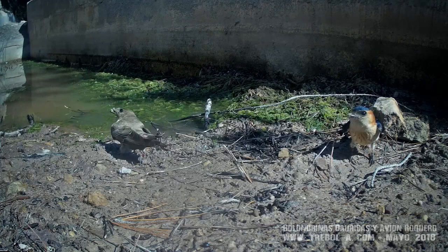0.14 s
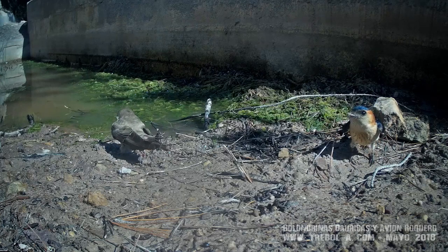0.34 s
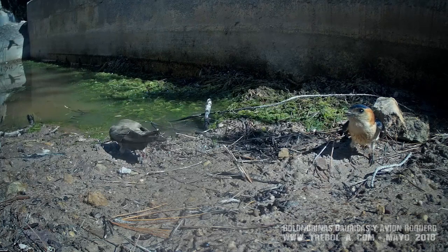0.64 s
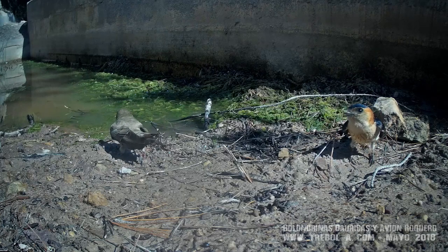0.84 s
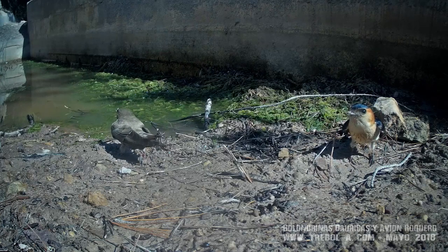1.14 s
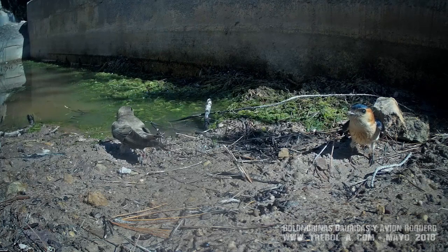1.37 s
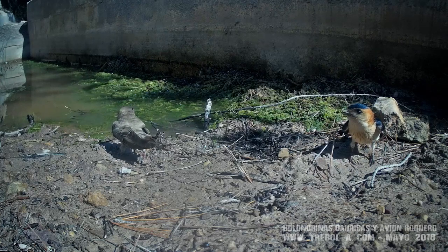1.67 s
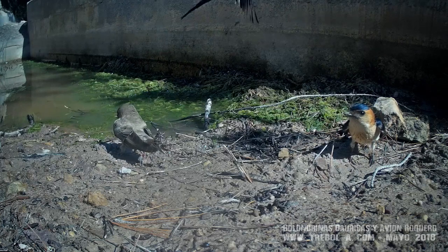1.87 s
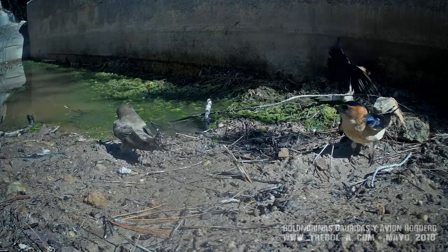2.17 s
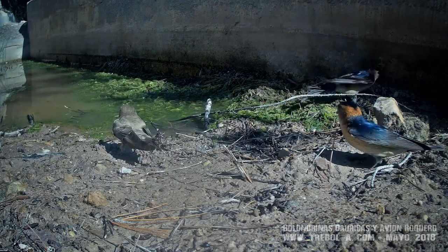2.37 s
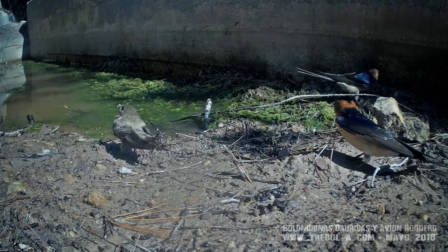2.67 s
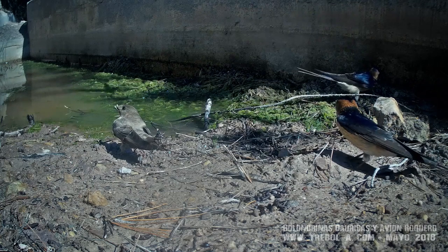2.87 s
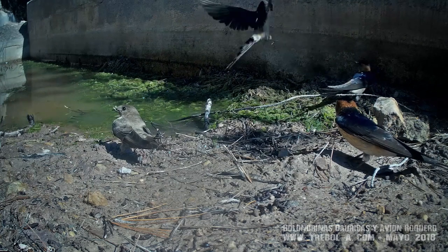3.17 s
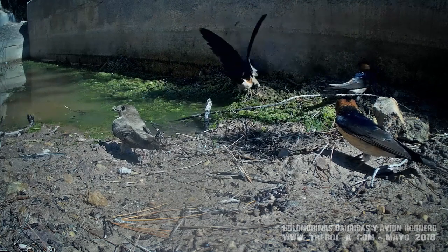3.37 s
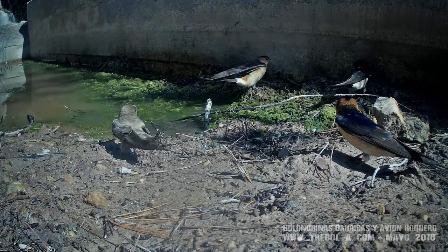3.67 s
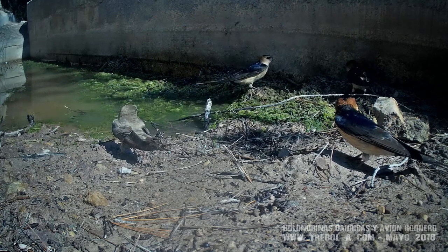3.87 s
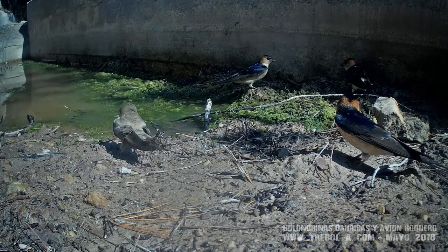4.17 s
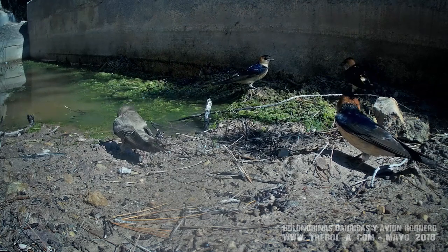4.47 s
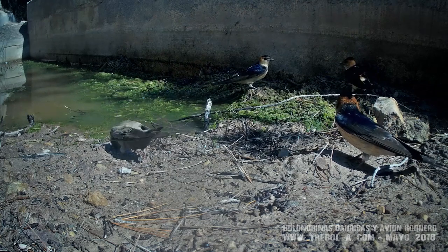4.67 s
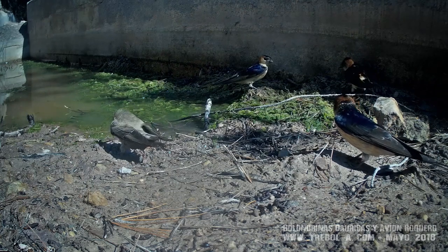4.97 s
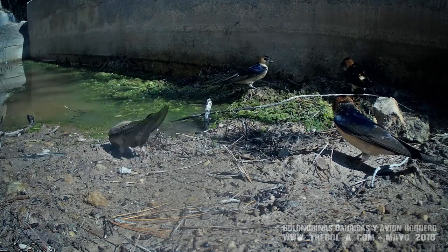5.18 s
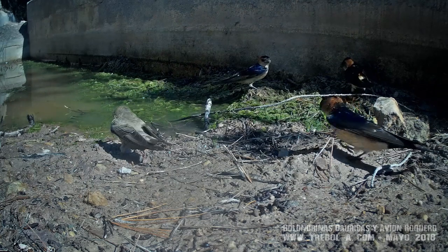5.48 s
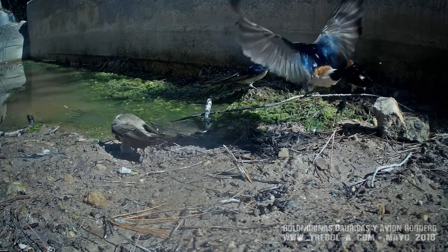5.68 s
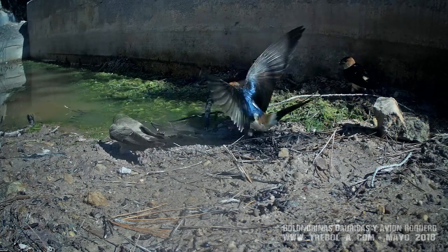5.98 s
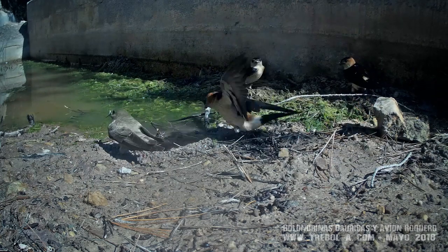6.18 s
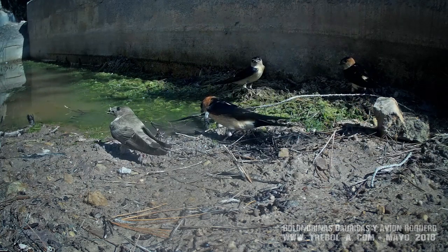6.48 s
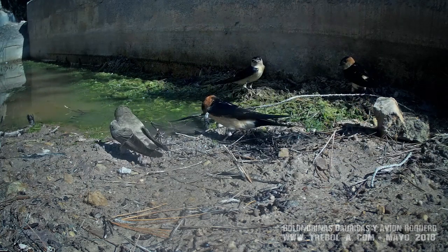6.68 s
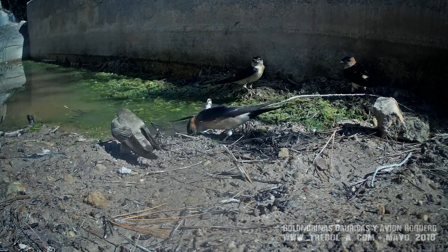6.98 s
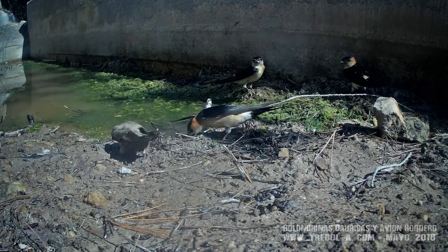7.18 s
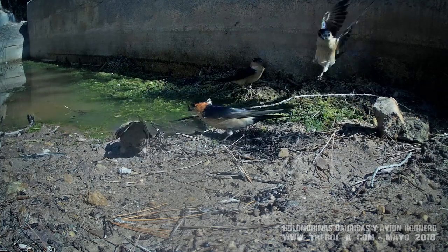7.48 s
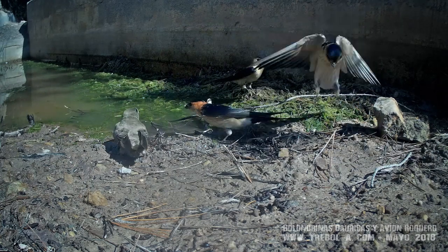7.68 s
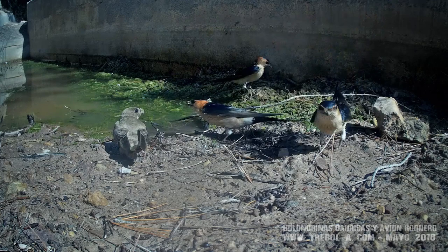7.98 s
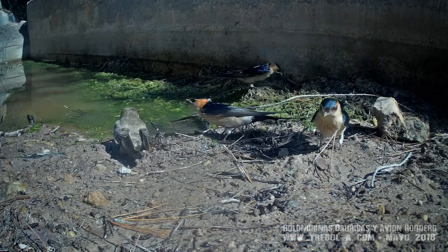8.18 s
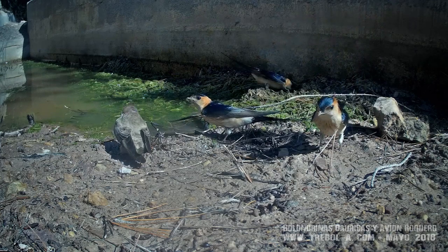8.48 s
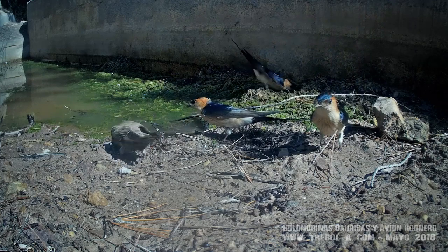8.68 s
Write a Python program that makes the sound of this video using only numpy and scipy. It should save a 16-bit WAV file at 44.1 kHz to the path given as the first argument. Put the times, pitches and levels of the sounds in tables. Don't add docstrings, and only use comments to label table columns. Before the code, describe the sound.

A near small bird repeats quick, buzzy double chirps while a softer mate answers; wings flutter briefly over faint traffic hum, wind and hiss.

```python
import sys
import numpy as np
from scipy import signal
from scipy.fft import rfft, irfft, next_fast_len
from scipy.io import wavfile
from scipy.ndimage import uniform_filter1d, map_coordinates

SR = 44100
rng = np.random.default_rng(int(sys.argv[2]) if len(sys.argv) > 2 else 0)


def amplitude_ratio(level_db):
    exponent = np.asarray(level_db, float) / 20
    return 10 ** exponent


def persist_wave(psi):
    counts = np.round(np.clip(psi, -1, 1) * 32767).astype(np.int16)
    wavfile.write(sys.argv[1], SR, np.atleast_2d(counts).T)


N = 389403

# [t/s, level/dB]
GUSTS = [(0.0, -68), (2.11, -63.5), (2.88, -67), (2.95, -54), (3.81, -70.5), (3.96, -50), (4.01, -69),
         (5.61, -68.5), (5.63, -60), (6.69, -69), (7.84, -59.5), (7.92, -69), (8.73, -67.5), (8.83, -60.5)]
# [f/Hz, level/dB]
WIND_COLOUR = [(11, -33), (18, 11.5), (59, 8), (97, 4.5), (167, 0), (200, -3.5), (260, -62), (440, -120)]
HUM_COLOUR = [(35, -40), (60, -0.5), (241, -3.5), (428, -7), (504, -8.5), (574, -10), (644, -10.5),
              (1180, -16), (3000, -28.5), (3900, -69.5), (6600, -120)]
HISS_COLOUR = [(880, 1.5), (1500, -18), (1880, -0.5), (2080, -10.5), (3030, -4), (4420, -3.5), (4690, -5.5),
               (14200, -7.5), (16000, -11)]
# [t/s, peak level/dB, feather hiss level/dB]
FLAPS = [(2.082, -36.5, -33.5), (2.129, -53, -4), (3.299, -52, 14), (3.449, -52, -10), (5.718, -55, -12),
         (5.839, -38.5, -22), (5.919, -40.5, -9), (7.449, -43, -22), (7.469, -40, -17.5),
         (7.609, -42.5, -16), (7.699, -54.5, -17.5), (7.779, -62, -11.5)]
# [delay t/s, level/dB]
ECHOES = [(.0058, -17), (.0068, -18), (.0127, -17), (.0163, -15), (.0189, -14), (.02, -16), (.0207, -13),
          (.04, -27)]
# [f/Hz, time to fall 60 dB t/s]
YARD_RING = [(500, .1), (2000, .1), (3500, .1), (7000, .085), (14000, .055)]
# [f/Hz, level/dB]
SIDEWAYS = [(600, -8), (1400, 2), (2200, -2), (3000, 3), (3600, -8), (3850, -5), (4300, 0), (4800, -7),
            (5600, -4), (12000, -5)]
# [f/Hz, level/dB]
HOUSING = [(3150, 1), (3380, 8), (3600, 11), (3800, 1), (4150, -10), (4600, 0), (6600, -1), (7400, -19),
           (9500, -5), (11300, 5), (12500, 2), (13400, -11), (14700, 2), (16000, 1)]
HOUSING_ASIDE = [(3100, 0.15), (3550, 5), (4050, -7), (5000, 0), (6200, -4), (7800, -4), (11000, 3),
                 (15000, -10)]
# [t/s, share 0-1]
ASIDE = [
    (2, 0.01),
    (2.3, 0.13),
    (3.4, 0.043),
    (3.9, 1),
]

# [start t/s, top t/s, start f/Hz, top f/Hz, effort level/dB]
GROUND_BIRD = [
    (5.988, 6.033, 756, 845, -46),
    (6.026, 6.042, 816, 837, -51),
    (6.068, 6.094, 1366, 1296, -61.5),
    (6.092, 6.111, 1310, 1331, -67),
]
FAR_BIRD = [
    (0.404, 0.44, 1417, 1850, -80.5),
    (0.448, 0.471, 1348, 2010, -80),
    (1.327, 1.372, 1669, 2080, -84.5),
    (1.382, 1.409, 1744, 2310, -86.5),
]
# [start t/s, second glide t/s, its length t/ms, effort level/dB, second effort level/dB]
MATE_CALLS = [(0.887, 0.96, 29, -53.5, -64.5), (2.475, 2.548, 19.9, -46, -51),
              (2.652, 2.727, 25, -57, -52.5), (2.901, 2.971, 30.2, -51.5, -45.5),
              (3.087, 3.166, 36, -57, -57), (3.442, 3.521, 30.7, -59, -55.5),
              (3.707, 3.792, 36, -58, -63.5), (4.237, 4.332, 11, -65, -53), (4.503, 4.597, 15.7, -63, -59),
              (5.805, 5.905, 18.4, -64, -62.5), (6.325, 6.424, 22.4, -66, -80)]
# [start t/s, quick glide t/s, slow top f/Hz, slow effort level/dB, quick effort level/dB]
NEAR_CALLS = [(0.612, 0.691, 1519, -39, -33), (0.834, 0.91, 1517, -38, -31), (1.068, 1.145, 1486, -38, -34),
              (1.539, 1.626, 1530, -40.5, -31), (1.772, 1.853, 1600, -39, -30.5),
              (2.16, 2.256, 1472, -41, -32.5), (2.387, 2.474, 1611, -41.5, -34.5),
              (2.843, 2.924, 1571, -43, -33.5), (3.263, 3.347, 1528, -43, -35.5),
              (3.961, 4.066, 1486, -50, -45.5), (4.326, 4.419, 1527, -46.5, -38.5),
              (4.711, 4.812, 1433, -49, -50)]
# [start t/s, top t/s, start f/Hz, top f/Hz, effort level/dB]
ENCORES = [
    (0.74, 0.755, 1213, 1900, -38.5),
    (4.852, 4.879, 1422, 1944, -57.5),
]

GROUND_VOICE = [-14.5, 1, -12, -13, -19.5]
GRUMBLE_VOICE = [12, -12, -1, -18.5, -22]
MATE_VOICE = [0.5, 6.5, -8, -5, -4.5]
NEAR_VOICE = [-0.5, 2.5, -9, -5.5, -13.5]
# [f/Hz, level/dB]
MATE_THROAT = [(700, -7), (1200, -5.5), (1700, 2), (2400, 0.5), (3000, -4.5), (4800, 5.5), (6000, 2.5),
               (8000, 1.5), (10500, -5.5), (14000, -19.5)]
NEAR_THROAT = [(600, -7), (1300, -5.5), (2200, 1.5), (3000, -1.5), (5200, 6.5), (6600, -3), (9000, -3.5),
               (11300, -6.5), (14800, -21.5)]
# [t/s, treble tilt level/dB per octave]
MATE_FACING = [(.43, -2.5), (1.368, 8), (2.5, -2), (2.7, 0), (3.15, -1.9), (3.5, -1.4), (3.77, -5.5),
               (4.28, -3), (4.55, -2.5), (5.861, -3), (6.38, -3.5)]
NEAR_FACING = [(.7, 2.7), (.9, 1.5), (1.13, 2), (1.6, 1.8), (1.83, 1.3), (2.23, 0.5), (2.45, -0.5),
               (2.9, 1), (3.331, 0.5), (4.03, 1.3), (4.399, 0.5), (4.799, -0.5)]


def unit(x):
    return x / np.sqrt(np.mean(x ** 2) + 1e-20)


def along(points, hz):
    f, v = np.transpose(points)
    return np.interp(np.log(hz + 1), np.log(f + 1), v)


def wobble(rate, size):
    knots = rng.standard_normal(int(size * rate / SR) + 4)
    return map_coordinates(knots, [np.arange(size) * rate / SR])


def coloured(x, spectrum):
    m = next_fast_len(N + 8192)
    gain = amplitude_ratio(along(spectrum, np.fft.rfftfreq(m, 1 / SR)))
    return irfft(rfft(x, m) * gain, m)[..., :N]


def rush(spectrum, patchy_db):
    z = signal.stft(rng.standard_normal(N + 512), nperseg=512)[2]
    field = uniform_filter1d(rng.standard_normal(z.shape), 6, 0)
    field = uniform_filter1d(field, 10, 1)
    noise = signal.istft(z * amplitude_ratio(patchy_db * unit(field)), nperseg=512)[1][:N]
    return unit(coloured(noise, spectrum))


def air(birds):
    s, wind_db = np.transpose(GUSTS)
    gust_db = np.interp(np.arange(N) / SR, s, wind_db) - 0.5 + 1.78 * wobble(3.1, N)
    wind = amplitude_ratio(gust_db) * rush(WIND_COLOUR, patchy_db=0.5)
    stirred = amplitude_ratio(-45.5) * np.abs(uniform_filter1d(birds ** 2, 1500)) ** (0.45 / 2)
    hum_level = amplitude_ratio(-59 + 0.87 * wobble(5, N) + .6 * wobble(1.5, N))
    hum = np.hypot(hum_level, stirred) * rush(HUM_COLOUR, patchy_db=0.54)
    hiss = amplitude_ratio(-68.5) * rush(HISS_COLOUR, patchy_db=-0.6)
    return wind + hum + hiss


def wings():
    t, push, feather = np.arange(N) / SR, np.zeros(N), np.zeros(N)
    for s, db, hiss_db in FLAPS:
        stroke = np.maximum(t - s + 0.0067, 0) / 0.0098
        puff = amplitude_ratio(db) * stroke * np.exp(1 - stroke)
        push += puff
        feather += amplitude_ratio(hiss_db) * puff
    thud = rush([(60, -17.0), (250, 8), (1200, -2), (2500, -25)], patchy_db=-4.5)
    rustle = rush([(1500, -33), (3000, 0), (8000, 9), (15000, -10)], patchy_db=2)
    return amplitude_ratio(-18.0) * push * thud + amplitude_ratio(-13) * feather * rustle


def yard(x, echo_db, tail_db):
    hz, t, z = signal.stft(rng.standard_normal(SR // 3), SR, nperseg=128)
    fall = amplitude_ratio(-60 * t / along(YARD_RING, hz)[:, None])
    tail = signal.istft(z * fall, SR, nperseg=128)[1]
    tail *= np.minimum(np.arange(len(tail)) / (.005 * SR), 1)
    answer = amplitude_ratio(tail_db) * tail / np.linalg.norm(tail)
    for delay, db in ECHOES:
        rough = np.convolve(rng.standard_normal(9), np.ones(4)) * np.hanning(12)
        answer[round(delay * SR):][:12] += amplitude_ratio(db + echo_db) * rough / np.linalg.norm(rough)
    return x + signal.fftconvolve(coloured(x, SIDEWAYS), answer)[:N]


def song(glides, sag, release, swell_db, break_db, attack, kick, sharp, hook_db):
    pitch, low_side, effort = np.full(N, 1000.), np.full(N, 1000.), np.zeros(N)
    following = list(glides[1:]) + [(np.inf, 0, 0)]
    fresh, tired_db = True, np.zeros(N)
    for (start, top, from_hz, top_hz, bend, db), after in zip(glides, following):
        joined = after[0] - top < .0255
        if joined:
            end, end_hz = max(after[0], top + .001), after[2]
        else:
            end, end_hz = top + release, sag * top_hz
        begin = start - fresh * .005
        span = slice(round(begin * SR), round(end * SR))
        t = np.arange(span.start, span.stop) / SR
        u = np.minimum((t - start) / (top - start), 1)
        v = np.clip((t - top) / (end - top), 0, 1)

        flick = fresh * kick * top_hz
        climb = (top_hz - from_hz) * (1.1 - bend) * (end - top) / (top - start)
        rise = from_hz + (top_hz - from_hz) * (u + bend * u * (1 - u))
        rise += flick * np.exp(np.minimum(t - top, 0) / 0.003)
        pitch[span] = rise + climb * v + (end_hz - top_hz - flick - climb) * v ** 2.2
        low_side[span] = pitch[span] * (1 + sharp * u)

        onset = .3 + .7 * np.clip((t - begin) / attack, 0, 1) if fresh else 1
        if joined:
            fade = amplitude_ratio(break_db * np.sin(np.pi * v))
        else:
            fade = amplitude_ratio(hook_db * np.minimum(3 * v, 1)) * np.minimum((1 - v) / .2, 1)
        effort[span] = amplitude_ratio(db + swell_db[not fresh] * (u - .5)) * onset * fade
        tired_db[span] = -16 * np.sqrt(v) * (not joined)
        fresh = not joined
    return pitch, low_side, tired_db, uniform_filter1d(effort, 60)


def bird(tune, voice, throat, facing, count, jitter, flutter_db, breath_db):
    pitch, low_side, tired_db, effort = tune
    on = effort > 1e-7
    tilt_db = np.interp(np.arange(N)[on] / SR, *np.transpose(facing))
    unsteady = 1 + jitter * wobble(300, N)
    tone = np.zeros(N)
    for k in range(1, count + 1):
        db = voice[min(k, len(voice)) - 1] - .6 * max(k - len(voice), 0)
        line = low_side if k == 1 else pitch
        hz = k * (uniform_filter1d(line, 40) * unsteady)[on]
        shake = flutter_db * wobble(220, len(hz))
        level_db = db + along(throat, hz) + tilt_db * np.log2(hz / 3000) + shake
        gain = amplitude_ratio(level_db + (k == 1) * tired_db[on]) * (hz < .4 * SR)
        tone[on] += gain * np.sin(2 * np.pi * np.cumsum(hz) / SR + rng.uniform(0, 2 * np.pi))
    breath_colour = throat[:4] + [(5500, 5), (8000, -4), (11500, -5), (16000, -12)]
    breath = amplitude_ratio(breath_db) * unit(coloured(rng.standard_normal(N), breath_colour))
    strain = .3 + np.clip(pitch / 1800, 0, 1.2) ** 2
    return effort * (tone + strain * coloured(breath, SIDEWAYS))


def bent(glides, bend):
    return [(*glide[:4], bend, glide[4]) for glide in glides]


def ground_bird():
    chat, grumble = [song(bent(notes, .7), sag=.98, release=.004, swell_db=(0, 0), break_db=-5,
                          attack=.008, kick=0, sharp=0, hook_db=0)
                     for notes in (GROUND_BIRD[:2], GROUND_BIRD[2:])]
    beak = [(500, -6), (1200, -12), (2500, 1.0), (4000, -7), (5500, -12.5), (9000, 4.5)]
    facing = [(6, 0)]
    sound = bird(chat, GROUND_VOICE, beak, facing, count=9, jitter=.0065, flutter_db=4, breath_db=-7)
    sound += bird(grumble, GRUMBLE_VOICE, beak, facing, count=5, jitter=.007, flutter_db=4, breath_db=-7)
    return yard(sound, -5.5, -8)


def mate_glides():
    rows = bent(FAR_BIRD, .2)
    for s, again, ms, db, second_db in MATE_CALLS:
        lazy = again - s - .07
        start_hz, top_hz = 1190 - 3500 * lazy, 2110 - 17000 * lazy
        break_s = .013 if lazy > .006 else .021
        second_top = again + min(ms, 35) / 1000
        rows += [(s, again - break_s, start_hz, top_hz, .07, db),
                 (again, second_top, 1560, top_hz + 340, .4, second_db)]
    return sorted(rows)


def mate_and_far_bird():
    tune = song(mate_glides(), sag=.86, release=.013, swell_db=(2, 5), break_db=-6,
                attack=.012, kick=.04, sharp=.13, hook_db=-9)
    sound = bird(tune, MATE_VOICE, MATE_THROAT, MATE_FACING, count=12, jitter=.007, flutter_db=4, breath_db=-5)
    return yard(sound, 2.5, -4)


def near_glides():
    rows = bent(ENCORES, 0)
    for s, again, top_hz, db, quick_db in NEAR_CALLS:
        weak = -38 - db
        top = again - max(.0145 - .0009 * weak, .003)
        bend = np.clip(.52 - 22 * (top - s - .065), 0, .52)
        rows += [(s, top, 625 + 14 * weak, top_hz, bend, db),
                 (again, again + .034, .75 * top_hz, 1940 - 8 * weak, .33, quick_db)]
    return sorted(rows)


def near_bird():
    tune = song(near_glides(), sag=.84, release=.014, swell_db=(5, 6), break_db=-3,
                attack=.026, kick=.05, sharp=.15, hook_db=-12)
    sound = bird(tune, NEAR_VOICE, NEAR_THROAT, NEAR_FACING, count=20, jitter=.007, flutter_db=3.3, breath_db=-6)
    return yard(sound, -2.5, -7)


def scene():
    near = near_bird()
    others = mate_and_far_bird() + ground_bird()
    aside = np.clip(np.interp(np.arange(N) / SR, *np.transpose(ASIDE)), 0, 1)
    front = coloured((1 - aside) * near + wings(), HOUSING)
    side = coloured(aside * near + others, HOUSING_ASIDE)
    return (front + side + air(near + others))[None]


def roll_off(x):
    return signal.sosfilt(signal.butter(12, 16190, fs=SR, output="sos"), x)


def record(dry):
    mix = coloured(dry, [(15750, 0), (16300, -58.0)])
    return roll_off(mix)


dry = scene()
out = record(dry)
persist_wave(out)
```